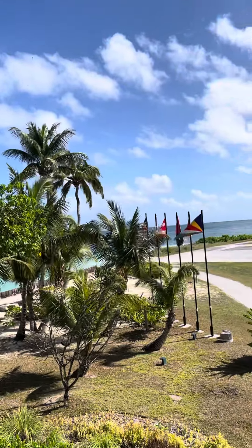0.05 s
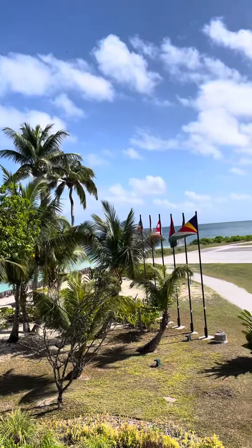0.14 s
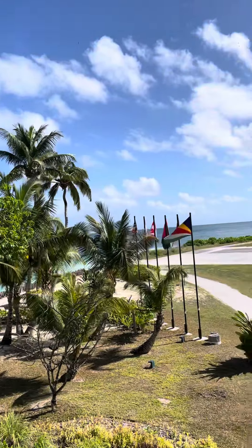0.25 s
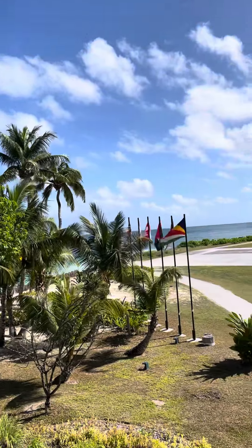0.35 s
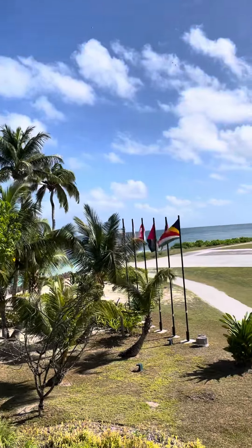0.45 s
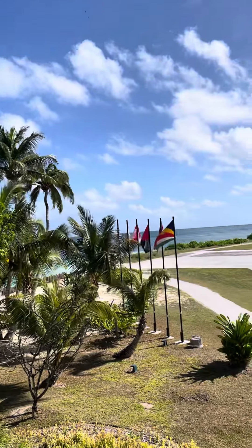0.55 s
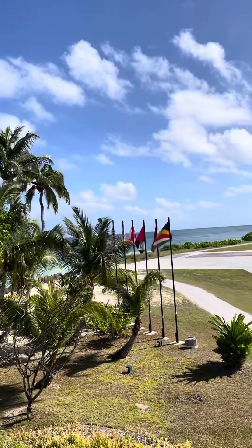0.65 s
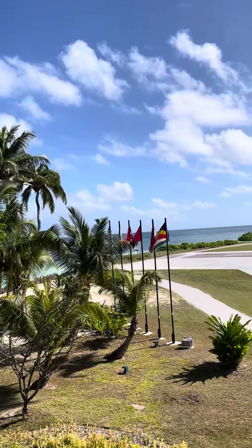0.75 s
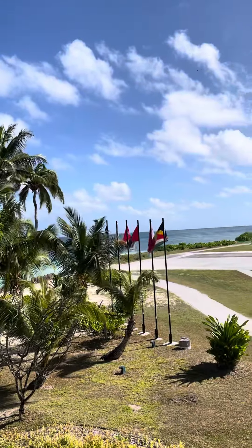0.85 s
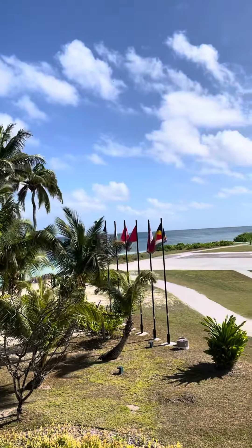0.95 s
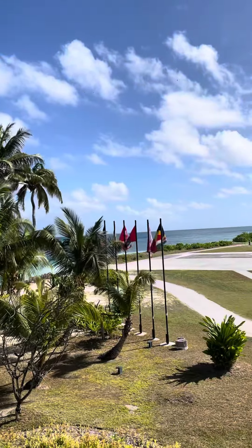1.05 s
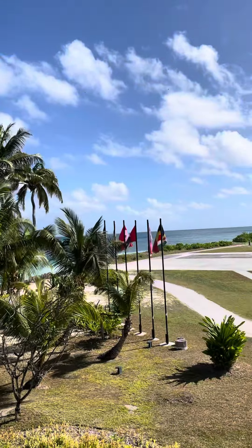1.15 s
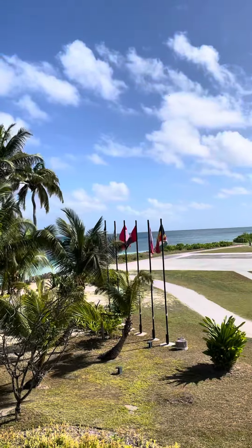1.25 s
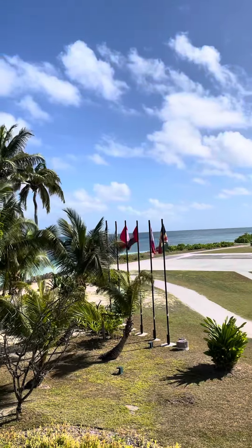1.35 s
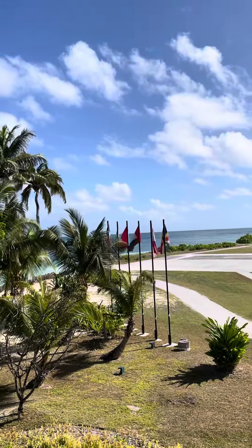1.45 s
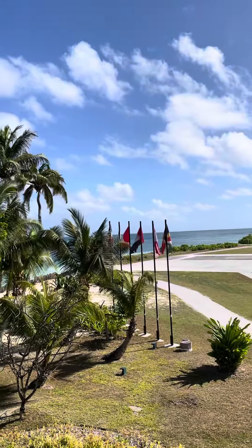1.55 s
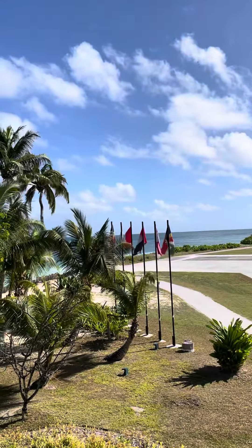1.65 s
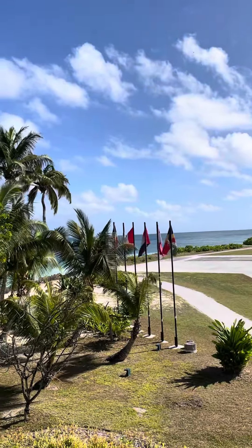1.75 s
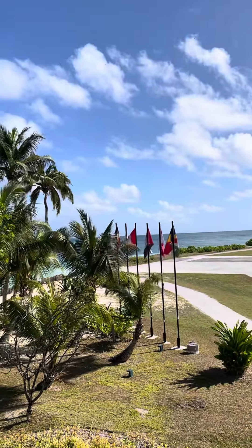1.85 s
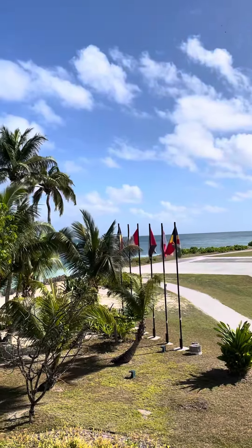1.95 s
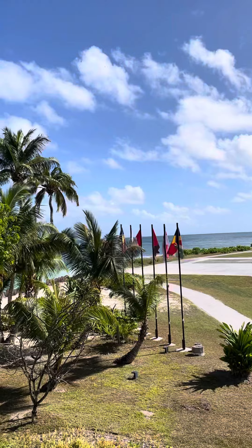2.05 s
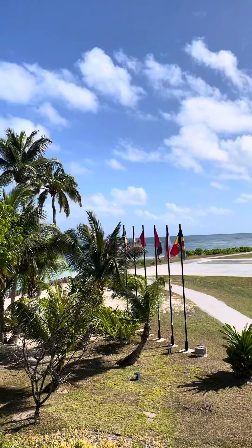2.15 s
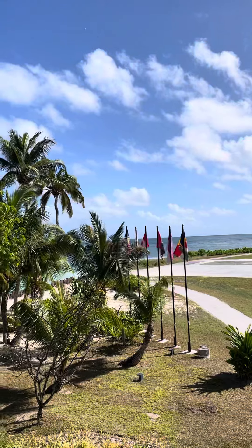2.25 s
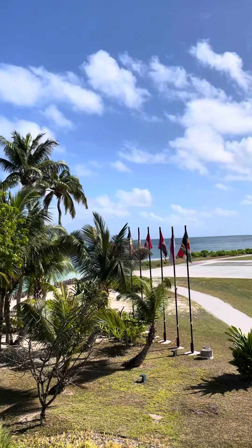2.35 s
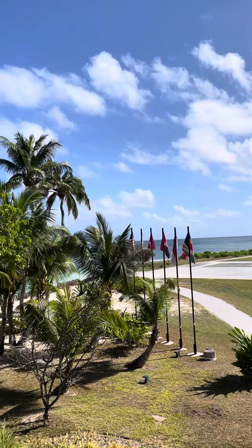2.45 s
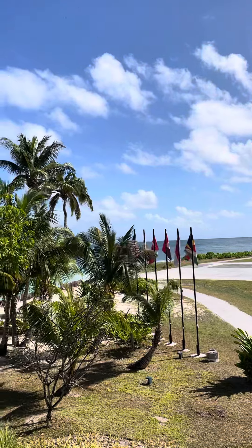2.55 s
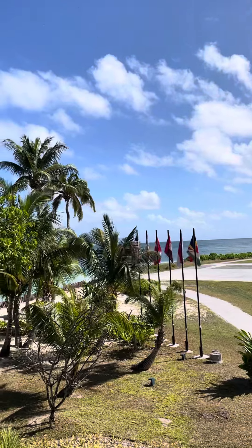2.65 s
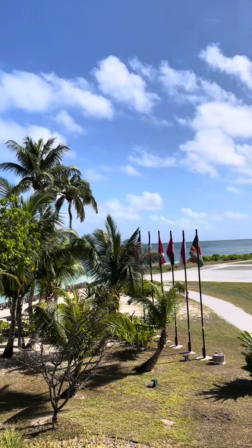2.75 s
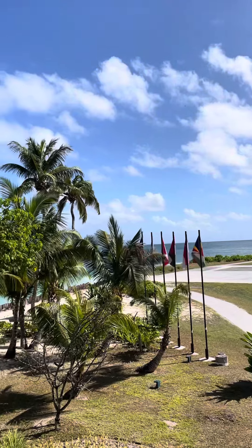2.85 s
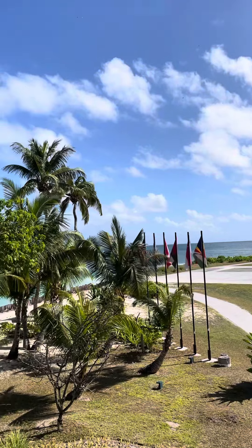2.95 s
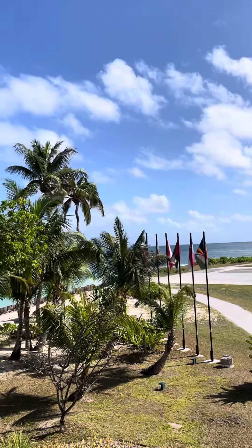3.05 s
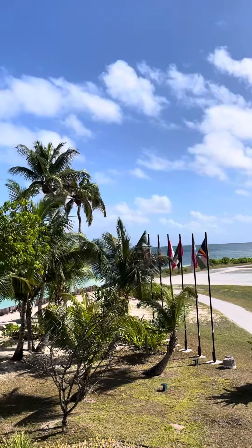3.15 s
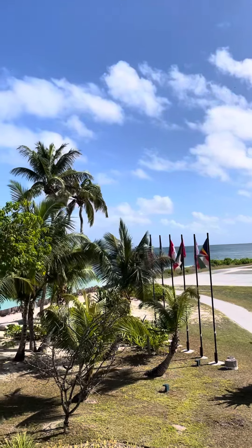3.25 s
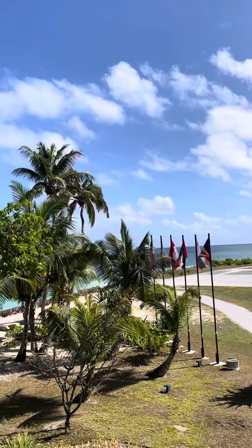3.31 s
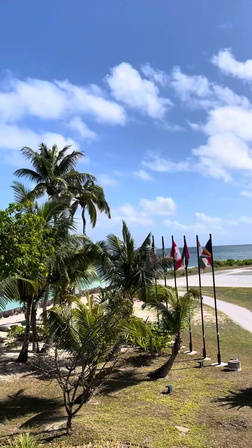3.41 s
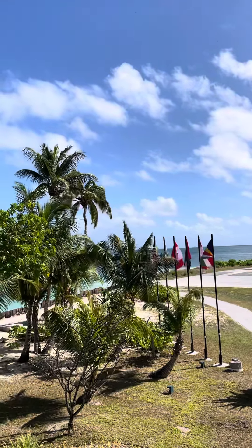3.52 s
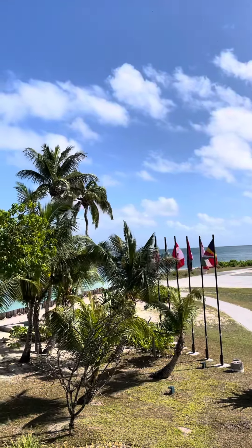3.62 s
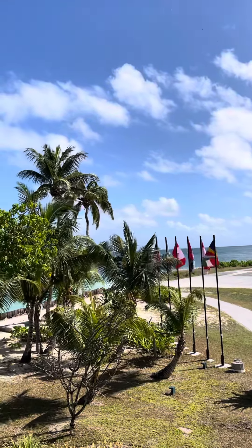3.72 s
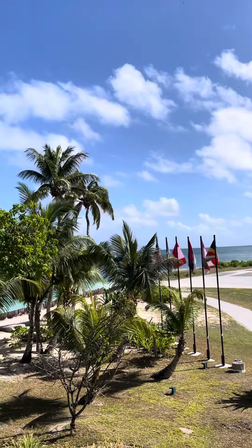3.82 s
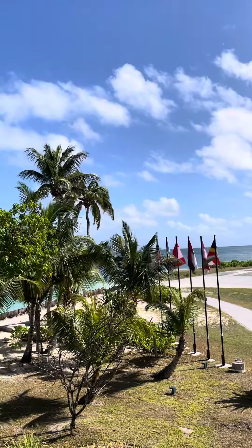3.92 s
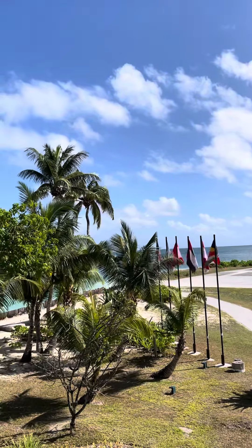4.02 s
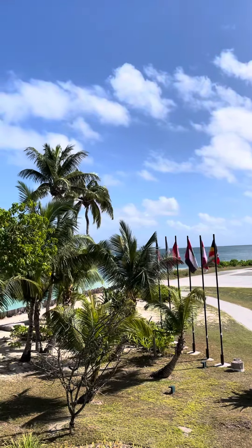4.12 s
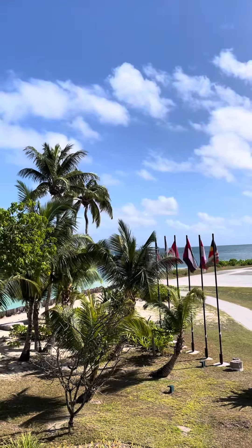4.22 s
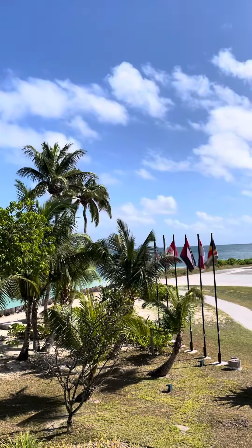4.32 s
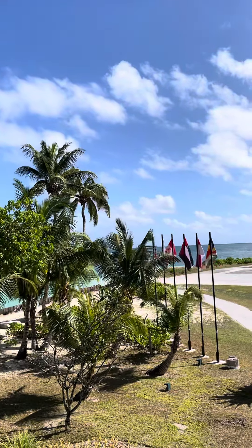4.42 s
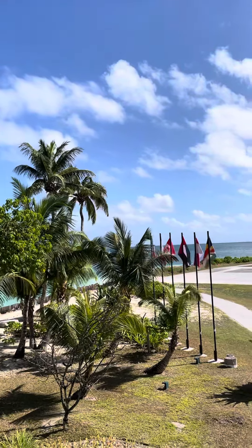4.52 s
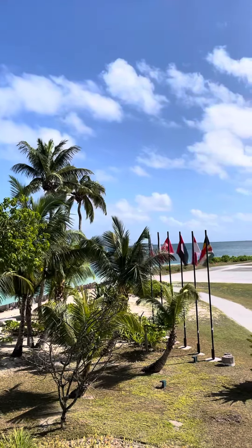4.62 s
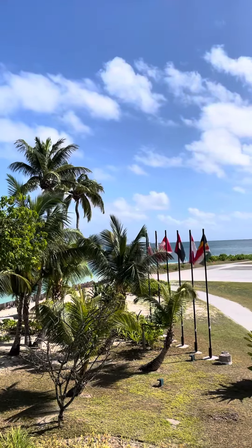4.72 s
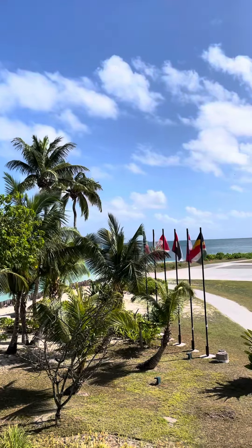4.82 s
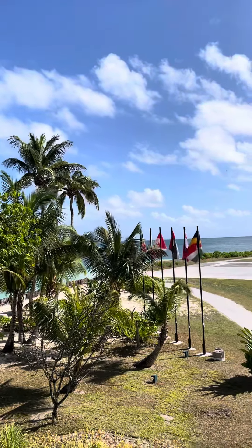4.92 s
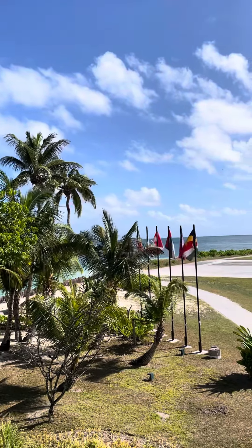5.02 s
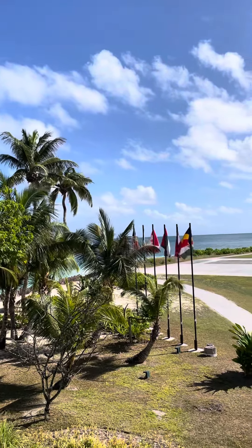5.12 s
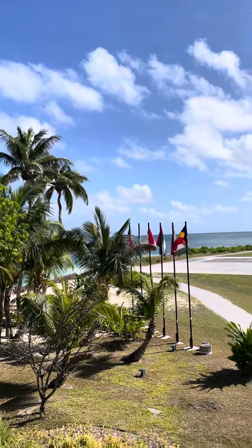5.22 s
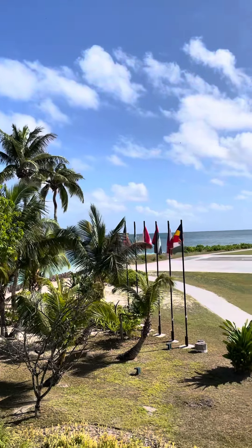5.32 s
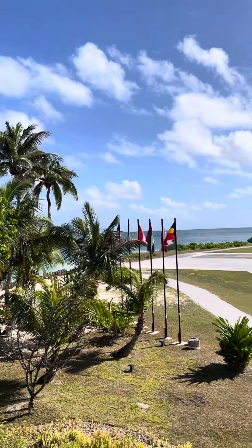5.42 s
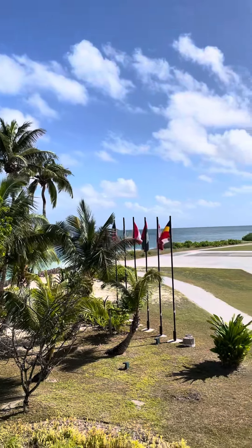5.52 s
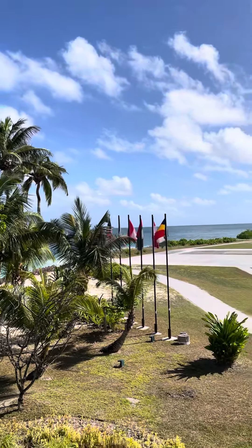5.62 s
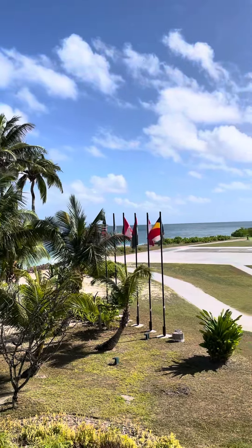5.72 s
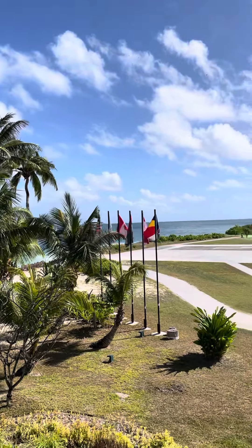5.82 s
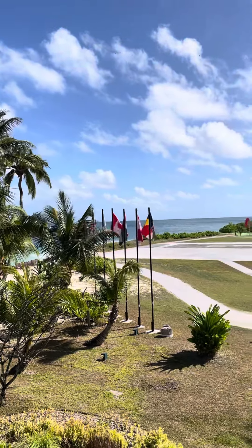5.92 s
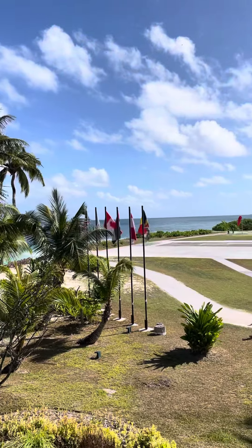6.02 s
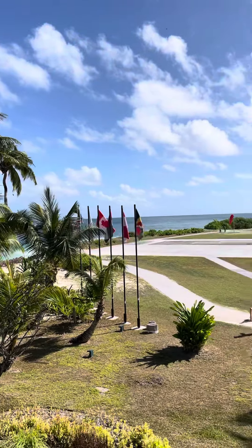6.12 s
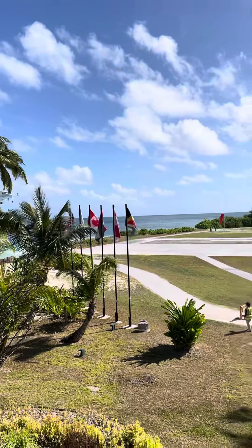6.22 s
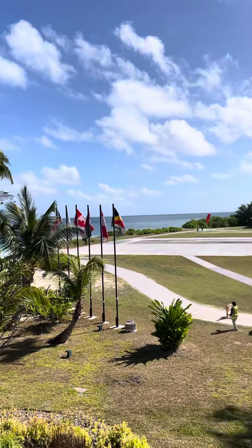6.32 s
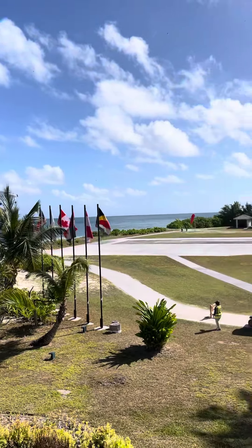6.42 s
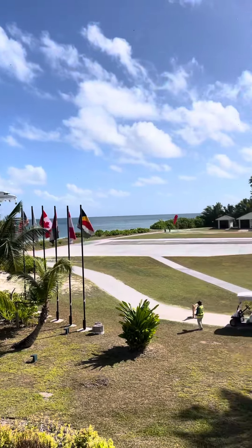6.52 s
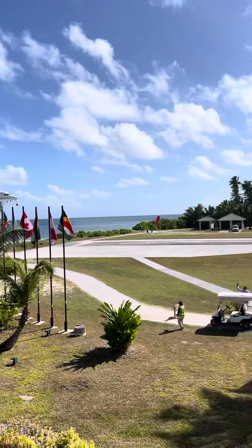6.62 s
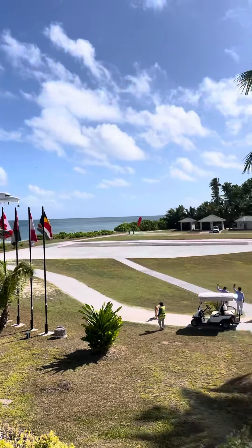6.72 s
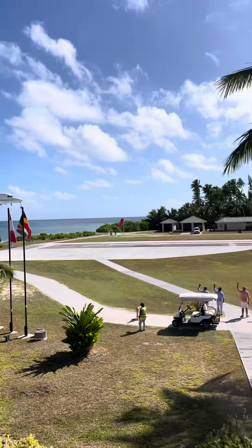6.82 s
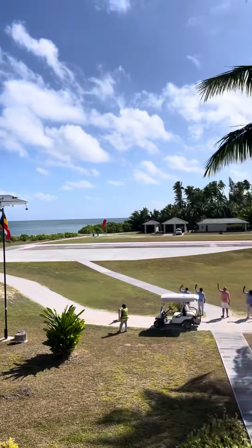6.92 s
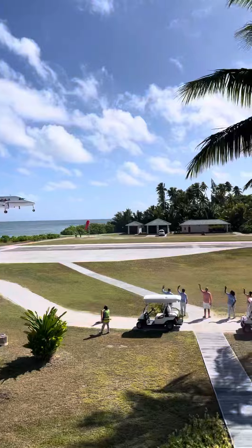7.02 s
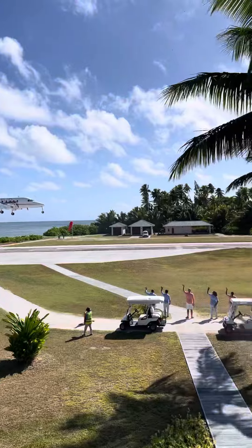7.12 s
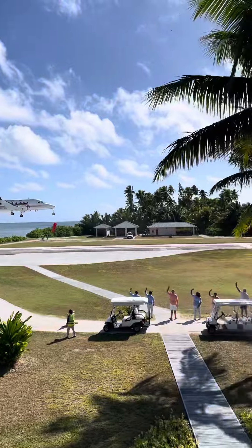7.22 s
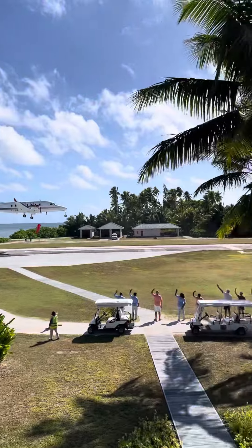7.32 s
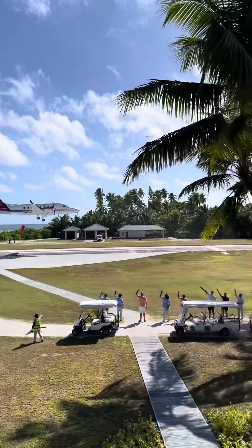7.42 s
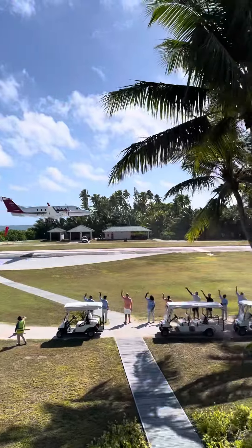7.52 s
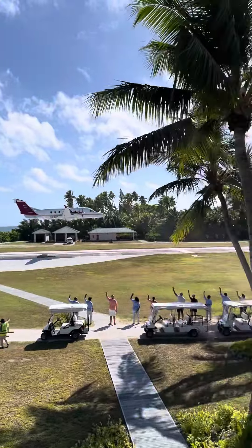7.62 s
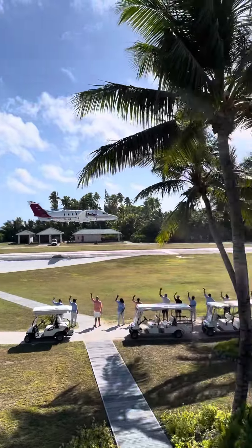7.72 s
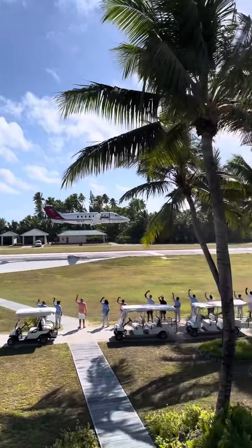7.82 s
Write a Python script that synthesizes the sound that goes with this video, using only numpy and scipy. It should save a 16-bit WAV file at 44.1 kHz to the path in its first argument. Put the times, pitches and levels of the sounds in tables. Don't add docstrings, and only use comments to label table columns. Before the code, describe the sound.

A twin turboprop plane approaches low outdoors, its muffled roar swelling behind palms, then bursting into bright hiss and whine with light wind puffs.

```python
import sys
import numpy as np
from scipy import signal
from scipy.io import wavfile
from scipy.ndimage import uniform_filter1d, map_coordinates

SR = 44100
rng = np.random.default_rng(int(sys.argv[2]) if len(sys.argv) > 2 else 0)


def volts(x):
    e = np.asarray(x, float) / 20
    return 10 ** e


def materialize(psi):
    bounded = np.clip(np.atleast_2d(psi).T, -1, 1)
    quanta = np.round(bounded * 32767).astype(np.int16)
    wavfile.write(sys.argv[1], SR, quanta)


N = 346493
TIME = np.arange(N) / SR
FRAME = 2048
SOUND_MS = 343


def unit(x):
    return x / np.sqrt(np.mean(np.abs(x) ** 2) + 1e-20)


def along(points, hz):
    f, *cols = np.transpose(points)
    values = np.array([np.interp(np.log(hz + 1), np.log(f + 1), c) for c in cols])
    return values if len(cols) > 1 else values[0]


def curves(rows, t=TIME):
    s, *cols = np.transpose(rows)
    return [np.interp(t, s, c) for c in cols]


def bumps(rows, half_s, t=TIME):
    return sum(np.interp(t, [s - half_s, s, s + half_s], [0, db, 0]) for s, db in rows)


def fade_in_out(start, end, edge_s, t=TIME):
    return np.interp(t, [start - edge_s, start + edge_s, end - edge_s, end + edge_s], [0, 1, 1, 0])


def wobble(rate):
    knots = rng.standard_normal(int(N * rate / SR) + 4)
    return map_coordinates(knots, [TIME * rate])


def rush(shape, patchy_db):
    hz, t, z = signal.stft(rng.standard_normal((2, N)), SR, nperseg=FRAME)
    gain = shape(hz[:, None], t) * np.ones(z.shape[1:])
    gain = gain / np.sqrt(np.mean(gain ** 2, axis=0))
    patches = uniform_filter1d(rng.standard_normal(gain.shape), size=10, axis=0)
    patches = unit(uniform_filter1d(patches, size=4, axis=1))
    return unit(signal.istft(z * gain * volts(patchy_db * patches), SR, nperseg=FRAME)[1][:, :N])


def hiss():
    both, apart = rng.standard_normal((2, N)) * volts([[-83], [-82]])
    return np.array([both + apart, both - apart])


# frequency in Hz, level in dB per Hz.
RUMBLE_COLOUR = [(12, -25), (25, 18), (45, 18), (70, 27), (95, 17.5), (140, -12), (400, -120)]
# time in seconds, level in dB over the lull.
WIND_SWELLS = [(0, 9), (2.3, 9.5), (2.82, 8), (3, 7), (3.45, 1), (4.45, 4), (5.08, 11), (5.64, 2),
               (6.57, 8), (6.88, 5), (7.08, 18), (7.5, 8), (7.86, 7)]
# time in seconds, peak level in dB, pitch in Hz.
WIND_PUFFS = [
    (0.279, -24, 56.5),
    (0.329, -22, 91.5),
    (2.289, -23, 140),
    (2.678, -22, 121),
    (2.819, -21, 61.9),
    (2.85, -22, 59.2),
    (2.999, -16, 150),
    (3.149, -26, 72.7),
    (4.129, -23, 59.2),
]


def wind():
    swell_db = bumps(WIND_SWELLS, half_s=0.28)
    level = volts(-45 + swell_db + 1.8 * wobble(4.98) + 0.99 * wobble(45)) + volts(-53.0)
    x = level * rush(lambda hz, t: volts(along(RUMBLE_COLOUR, hz)), patchy_db=-1.0)
    for s, db, hz in WIND_PUFFS:
        cycles = TIME[:SR // 5] * hz
        puff = cycles * np.exp(-1.4 * cycles) * np.sin(2 * np.pi * cycles)
        x[0, round((s - 0.0096) * SR):][:SR // 5] += volts(db + 10) * puff
    return x


# start in seconds, peak level in dB, starting pitch in Hz, ending pitch in Hz.
BIRD_TICKS = [
    (1.797, -42, 10200, 5940),
    (1.849, -43.5, 10200, 7600),
]


def bird():
    x = np.zeros(N)
    u = np.arange(0, 1, 1 / (0.014 * SR))
    for s, db, start_hz, end_hz in BIRD_TICKS:
        turn = 2 * np.pi * np.cumsum(start_hz + (end_hz - start_hz) * u) / SR
        envelope = np.sin(np.pi * u) * (1 + .5 * np.sin(17 * u))
        whistle = envelope * (np.sin(turn) + .3 * np.sin(2 * turn))
        snap = np.exp(-6 * u) * np.diff(rng.standard_normal(len(u) + 2), 2)
        x[round(s * SR):][:len(u)] += volts(db) * whistle + volts(db - 18) * snap
    return x


def flight(t=TIME):
    speed_ms, abeam_s, miss_m = 62.07, 7.998, 73.5
    ahead = speed_ms * (abeam_s - t)
    metres = np.hypot(ahead, miss_m)
    return metres, ahead / metres, 1 / (1 - speed_ms / SOUND_MS * ahead / metres)


# time in seconds, loudness in dB, cover by leaves in dB.
PALM_COVER = [(0, -34.5, 5), (1.9, -27, 6), (2.6, -23, 8), (3.4, -21.5, 9.5), (4.4, -21.5, 8),
              (5.05, -20, 9), (5.44, -19.5, 8.5), (5.51, -17, 11), (5.57, -21.5, 6), (6.1, -18.5, 8),
              (6.3, -16, 9), (6.5, -17, 5.5), (6.63, -18, -1.5), (6.9, -16.5, 0.5), (7.03, -15, 2.5),
              (7.1, -17, 0.5), (7.4, -18.5, 1.5), (7.86, -17, 2.5)]


def through_palms():
    return curves(PALM_COVER)


# start in seconds, end in seconds,
# middle of the band in Hz, change in dB.
BAND_SWELLS = [(0, 0.27, 660, -5.5), (1.1, 1.7, 666, -10.5), (1.6, 1.65, 860, -8.5), (.4, 0.74, 1720, -6),
               (0, 1.4, 1520, -3), (0.5, 1.3, 1370, 4), (1.5, 3.6, 469, -6), (1.3, 1.7, 300, 3.5),
               (1.3, 1.7, 570, 3.5), (1.3, 2.5, 210, -5), (2.3, 2.2, 1890, -2.5), (2.5, 3.6, 1700, -4),
               (3, 4.3, 1940, 2.5), (2.6, 4.2, 1306, -4), (3, 4.5, 400, -3), (0.8, 2.8, 3150, 3),
               (2.5, 3.9, 2520, -2.5), (3.4, 4.4, 5200, 2.5), (6.5, 6.52, 4300, -2.5), (5, 7.6, 4900, -3),
               (2, 2.7, 170, -5), (2.5, 4.2, 350, 3), (3.35, 3.3, 1100, -3), (2.5, 5.5, 1100, -4.5),
               (5, 5.78, 180, 4), (6, 6.3, 1050, -5.5), (6.5, 6.42, 1800, 3), (5.5, 5.9, 1900, 3.5),
               (6.5, 6.7, 280, 2), (7, 6.77, 5700, 3.5), (6.5, 7.4, 4900, -2.5), (5.5, 5.2, 810, 2.5),
               (4.5, 4.75, 260, 3), (5.5, 6.5, 950, -3), (5.5, 5.1, 240, 2.5), (4.6, 5.2, 1700, -3),
               (5.5, 5.4, 410, 3.5), (6, 6.1, 280, -3), (6, 6, 780, -6), (6, 6.45, 300, 3.5),
               (6.5, 6.55, 520, 6), (5.5, 6.7, 900, 5.5), (6.7, 6.95, 680, 2.5), (7, 7.6, 300, -5),
               (6.25, 6.45, 560, 3), (6.5, 6.92, 560, 3.5), (5.5, 5.72, 400, 2), (3.05, 3.3, 1100, 4),
               (5.5, 5.95, 700, -2.5), (6.5, 6.9, 90, -3.5), (7, 7.86, 115, -2.5), (7.5, 7.8, 5500, 1.5),
               (6.5, 6, 3200, 3.5), (7.45, 7.86, 1600, 4), (7.5, 7.86, 1300, -4)]


def band_swells(hz, t):
    gain_db = 0
    for start, end, centre_hz, db in BAND_SWELLS:
        width_hz = max(59, 0.068 * centre_hz)
        band = np.exp(-((hz - centre_hz) / width_hz) ** 2)
        gain_db = gain_db + db * band * fade_in_out(start, end, 0.11, t)
    return gain_db


# time in seconds,
# one crest in Hz, crest spacing in Hz, where the dips are deepest in Hz, depth in dB.
TERRACE_ECHO = [(0, 1090, 278, 1150, 1), (1.2, 1106, 280, 1300, 4.5), (1.9, 1106, 308, 1320, 6),
                (2.15, 1090, 320, 1260, 6), (2.45, 1010, 427, 1060, 4.5), (2.9, 914, 335, 680, 8),
                (3.3, 896, 340, 683, 8), (3.7, 887, 345, 706, 7.5), (4.1, 915, 368, 780, 6),
                (4.45, 913, 367, 714, 5.5), (4.7, 940, 400, 700, 2.5), (4.9, 966, 460, 600, 4),
                (5.2, 920, 480, 480, 6.5), (5.5, 895, 498, 445, 6.5), (5.65, 880, 520, 500, 1),
                (6, 886, 580, 347, 2), (6.2, 900, 580, 250, 4), (6.6, 910, 610, 498, 3.5),
                (7, 800, 557, 850, 4), (7.4, 730, 600, 810, 1), (7.86, 660, 600, 800, 5)]


def ground(hz, t):
    height_m, sink_ms, ear_m = 31, 1.88, 8.1
    spacing_hz = SOUND_MS * flight(t)[0] / (2 * ear_m * (height_m - sink_ms * t))
    grass = 0.088 * np.exp(-(hz / 2200) ** 2)
    crest_hz, step_hz, deep_hz, depth_db = curves(TERRACE_ECHO, t)
    reach = np.exp(-((hz - deep_hz) / 340) ** 2)
    comb_db = depth_db * np.cos(2 * np.pi * (hz - crest_hz) / step_hz) * reach
    return np.abs(1 + grass * np.exp(2j * np.pi * hz / spacing_hz)) * volts(comb_db + band_swells(hz, t))


# time in seconds, pitch in Hz.
COMPRESSOR_PITCH = [(0, 8260), (2.3, 8310), (3, 8320), (5, 8440), (6, 8560), (6.5, 8500), (6.75, 8480),
                    (7, 8550), (7.2, 8480), (7.4, 8520), (7.6, 8530), (7.86, 8700)]
# time in seconds, change in dB.
WHINE_GLINTS = [(6.55, -3), (6.59, 3), (6.78, 0.5), (6.86, -1), (6.9, 4), (7.04, 6.5), (7.2, 0), (7.28, 5),
                (7.36, -1), (7.41, 3.5), (7.48, -4), (7.6, -1), (7.72, 2), (7.82, 0)]


def whine():
    wander_hz = 50 * wobble(12)

    def shape(hz, t):
        _, nose, doppler = flight(t)
        off_hz = hz - curves(COMPRESSOR_PITCH, t)[0] * doppler - np.interp(t, TIME, wander_hz)
        peak = np.exp(-(off_hz / (140 + 380 * (1 - nose))) ** 2)
        skirt = np.exp(-((off_hz + 300) / 750) ** 2)
        return peak + (0.23 + .45 * nose ** 4) * skirt

    loud_db, cover_db = through_palms()
    metres, nose, _ = flight()
    level_db = loud_db - 12.5 - 1.11 * cover_db
    level_db = level_db - 0.12 * metres + 14.5 * nose
    level_db = level_db + bumps(WHINE_GLINTS, half_s=.04) + .9 * wobble(25)
    return (volts(level_db) + volts(-84.5)) * rush(shape, patchy_db=1.5)


# frequency in Hz, level in dB per Hz.
JET_COLOUR = [(200, -92), (700, -45), (1100, -10), (1450, -1), (1650, -1), (2100, 1), (2650, -3.5),
              (3150, -1.5), (3900, -5.5), (5500, -5.5), (6500, -10.5), (7500, -15), (11500, -19),
              (15500, -33)]
# time in seconds, change in dB.
FROND_GAPS = [(4.74, 3), (6.24, 3), (6.3, 2.5), (6.18, 2), (6.21, 1.5), (6.35, 2.5), (6.57, 1), (6.6, 1),
              (6.64, 3), (6.68, 1), (6.72, 3), (6.77, -0.5), (6.86, 1.5), (6.97, 1), (7.01, 1.5),
              (7.035, 3.5), (7.09, -1), (7.32, 3.5), (7.72, 5.5)]


def jet():
    clear_s, edge_s = 6.44, 0.052

    def shape(hz, t):
        behind_palms = (1 - np.tanh((t - clear_s) / edge_s)) / 2
        tilt_db_per_khz = 1.28 * behind_palms + 0.0029 * flight(t)[0] - .27
        return volts(along(JET_COLOUR, hz) - tilt_db_per_khz * hz / 1000) * ground(hz, t)

    loud_db, cover_db = through_palms()
    flicker_db = (0.27 + .8 * np.clip(1 - cover_db / 6, 0, 1)) * wobble(28)
    level_db = loud_db - 7 - cover_db + flicker_db + bumps(FROND_GAPS, half_s=0.029)
    return volts(level_db) * rush(shape, patchy_db=2.03)


# overtone number, start in seconds, end in seconds, level in dB.
BEAM_LOBES = [(1, 2.66, 4.5, -42), (1, 4.5, 4.9, -36.5), (1, 4.91, 5.5, -31.5), (1, 5.5, 5.98, -35.5),
              (1, 5.98, 6.1, -27.5), (1, 6.12, 6.3, -24.5), (1, 6.3, 6.92, -19.5), (1, 6.92, 7.2, -25.5),
              (1, 7.2, 7.5, -23), (1, 7.5, 7.9, -21.5), (2, 4.85, 5.15, -32), (2, 5.96, 6.4, -33.5),
              (2, 6.45, 6.8, -32), (2, 6.86, 7.5, -21.5), (2, 7.55, 7.95, -25.5), (3, 6.82, 6.93, -29.5),
              (3, 7.15, 7.7, -26.5), (3, 7.75, 7.95, -31), (4, 7.1, 7.8, -34)]


def blades():
    blade_hz, hunt_hz, hunt_s, hunt_top_s = 110.08, 1.1, 1.05, 6.92
    hunt = hunt_hz * np.cos(2 * np.pi * (TIME - hunt_top_s) / hunt_s)
    hunt = hunt * np.exp(-(TIME - hunt_top_s + .2) ** 2 / .6)
    turn = 2 * np.pi * np.cumsum(blade_hz * flight()[2] + hunt) / SR
    power = np.zeros((4, N))
    for k, start, end, db in BEAM_LOBES:
        power[int(k) - 1] += volts(2 * db) * fade_in_out(start, end, 0.073)
    x = np.zeros(N)
    for k, p in enumerate(power, 1):
        level = np.sqrt(np.abs(p)) * volts(5.5 + 0.4 * wobble(21))
        x += level * np.sin(k * turn + 0.21 * wobble(15))
    return x


# frequency in Hz, level in dB per Hz.
ROAR_COLOUR = [(20, -63.5), (45, -22), (90, -5), (140, 1), (250, 1.5), (600, -1.5), (950, -3.5), (1200, -8),
               (1450, -13), (1750, -17.5), (2600, -43), (5000, -120)]


def roar():
    def shape(hz, t):
        nearer_m = np.clip(310 - flight(t)[0], 0, None)
        deepen_db = 0.015 * nearer_m * hz / 1000
        return volts(along(ROAR_COLOUR, hz) - deepen_db) * ground(hz, t)

    body = rush(shape, patchy_db=1.5)
    return volts(through_palms()[0] + 0.54 * wobble(14)) * body


# frequency in Hz,
# left minus right in dB, lead of the left in radians, likeness from 0 to 1.
PAIR_FAR = [(30, .5, 0, .82), (110, 1.6, 0, .92), (200, 2.5, 0, .99), (350, 3.5, 0, .99), (600, 6, .9, .92),
            (780, 11, .5, .85), (950, 9.5, 0, .95), (1400, 6, .5, .87), (2200, 0, 1.4, .7),
            (3500, .5, 2.1, .6), (5500, .5, 2.4, .62), (6800, 0, 2.3, .4), (7500, 0, 3.1, .9),
            (9200, 0, 4.8, .8), (11500, 0, 6.3, .5), (14000, 0, 9.4, .5)]
PAIR_ABEAM = [(30, .2, 0, .9), (85, 1, 0, .94), (110, 1.5, 0, 1), (200, 2.2, 0, 1), (350, 2.8, .2, .98),
              (600, 11, .1, .85), (780, 9, .1, .85), (950, 7.5, .3, .88), (1400, 6.5, .1, .9),
              (2200, 3, 1.1, .8), (3500, 3, 1.1, .6), (5500, -1, 1.6, .7), (6800, 0, 1.8, .5),
              (7500, 0, 3.1, .9), (9200, 0, 4.8, .85), (11500, 0, 6.3, .9), (14000, 0, 9.4, .9)]
# time in seconds, share of PAIR_ABEAM from 0
PAIR_BLEND = [
    (0, 0),
    (4, 0.3),
    (6, 0.78),
    (6.8, 0.9),
    (7.86, 0.67),
]


def ports(pair):
    hz, t, (shared, own) = signal.stft(pair, SR, nperseg=FRAME)
    near = np.clip(curves(PAIR_BLEND, t)[0], 0, 1)
    far_part = along(PAIR_FAR, hz)[..., None] * (1 - near)
    db, lead, alike = far_part + along(PAIR_ABEAM, hz)[..., None] * near
    turn = np.arccos(np.clip(alike, -1, 1)) / 2
    left = (np.cos(turn) * shared + np.sin(turn) * own) * volts(db / 2) * np.exp(.5j * lead)
    right = (np.cos(turn) * shared - np.sin(turn) * own) * volts(-db / 2) * np.exp(-.5j * lead)
    return signal.istft(np.array([left, right]), SR, nperseg=FRAME)[1][:, :N]


# frequency in Hz, bar for left plus right in dB, bar for left minus right in dB.
DROP_BAR = [(6100, -60, -70), (6460, -36, -70), (6720, -30.5, -70), (6900, -30, -70), (6918, -6, -70),
            (8150, -9, -50), (8140, -41, -45), (9700, -35, -38), (10360, -40, -32.5), (10760, -24.5, -5),
            (11600, -22, 0), (12400, -24, 1), (12600, -25.5, -27), (13000, -25, -28), (13270, -15, -32),
            (14800, -16, -30), (15100, -26, -30), (15600, -26, -29)]
# frequency in Hz, level in dB.
DETAIL_BAR = [(1000, -30), (2000, -5), (4000, -2), (6000, 0.5), (8500, 2.5), (9700, -0.5), (11500, 4)]
# time in seconds, change in dB.
TREBLE_BAR_MOVES = [(6.34, 8), (6.39, 8), (6.44, -7), (6.49, -6), (6.6, 5), (6.7, 5), (6.76, 30),
                    (6.81, 14), (6.94, 20), (7.06, 26), (7.33, 5), (7.49, 4), (7.58, -5), (7.68, -4),
                    (7.76, -4)]
# time in seconds, change in dB.
SUDDEN_BAR_MOVES = [
    (6.49, -4),
    (7.2, -4),
    (7.25, -3.5),
    (1.8, -30),
    (1.86, -26),
    (7.86, -40),
]
# frequency in Hz, change in dB.
QUIET_BAR_SHIFT = [(6100, 0), (6460, 18), (6720, 18.5), (6900, 0), (8140, 0), (8200, 29), (8950, 21),
                   (9100, 5), (9500, 0), (10500, 2), (11000, -6), (12000, -9), (13000, -10), (13200, 0)]


def drop_weak_treble(x):
    band = 12
    hz, t, z = signal.stft(np.array([x[0] + x[1], x[0] - x[1]]) / 2, SR, nperseg=FRAME)
    starts = np.arange(0, len(hz), band)
    band_of_line = np.arange(len(hz)) // band
    band_power = np.add.reduceat(np.abs(z) ** 2, starts, axis=1) / band
    loudness = uniform_filter1d(band_power.mean(axis=(0, 1)), size=9)
    bar = loudness * (loudness / loudness.max()) ** .85
    bar_db = along(DROP_BAR, hz[starts])[..., None] + 2.0 * rng.standard_normal(band_power.shape)
    bar_db = bar_db + 2.5 * rng.standard_normal(len(t))
    bar_db = bar_db + bumps(SUDDEN_BAR_MOVES, .04, t)
    bar_db = bar_db + bumps(TREBLE_BAR_MOVES, .045, t) * (hz[starts, None] > 10500)
    quiet = np.clip(np.log10(loudness.max() / loudness) / 1.8, 0, 1)
    bar_db[0] += along(QUIET_BAR_SHIFT, hz[starts])[:, None] * quiet
    kept = (band_power > bar * volts(2 * bar_db))[:, band_of_line]
    detail_bar = band_power[:, band_of_line] * volts(2 * along(DETAIL_BAR, hz))[:, None] / 2
    kept = kept * (np.abs(z) ** 2 > detail_bar)
    both, apart = signal.istft(z * kept, SR, nperseg=FRAME)[1][:, :N]
    return np.array([both + apart, both - apart])


def scene():
    wide = wind() + whine() + jet() + roar()
    pure = blades() + bird()
    return ports(wide + pure * [[1], [0]]) + hiss()


def band_limit(x):
    return signal.sosfilt(signal.butter(12, 15700, fs=SR, output="sos"), x)


def record(dry):
    rolled = signal.sosfilt(signal.butter(2, 32, "high", fs=SR, output="sos"), dry)
    rounded = rolled / (1 + np.abs(rolled / .98) ** 6) ** (1 / 6)
    mix = drop_weak_treble(rounded)
    return band_limit(mix)


dry = scene()
out = record(dry)
materialize(out)
```